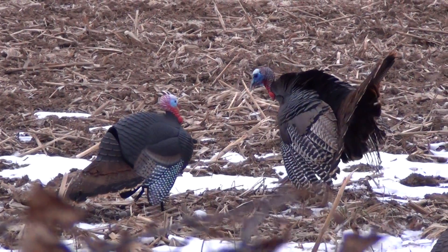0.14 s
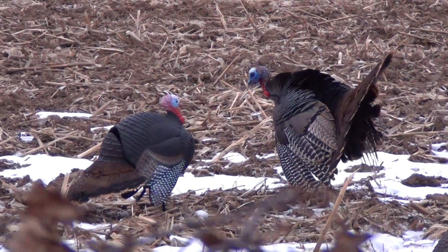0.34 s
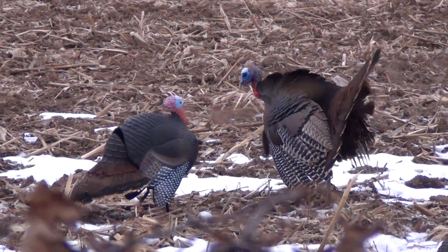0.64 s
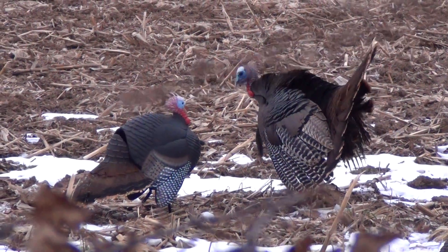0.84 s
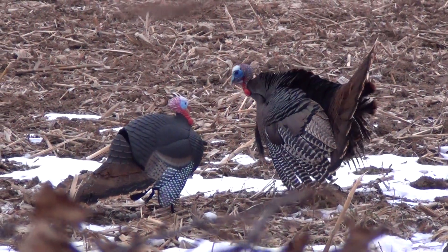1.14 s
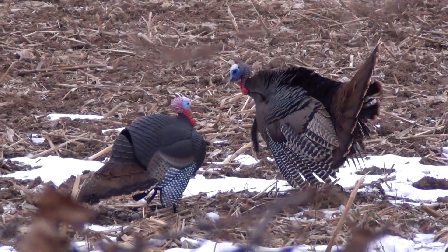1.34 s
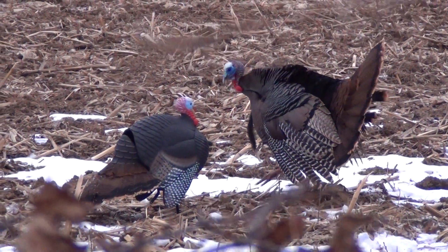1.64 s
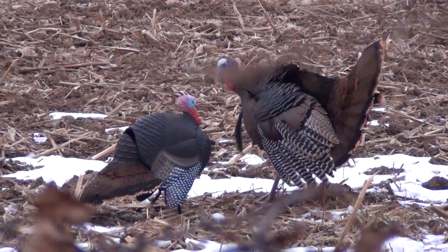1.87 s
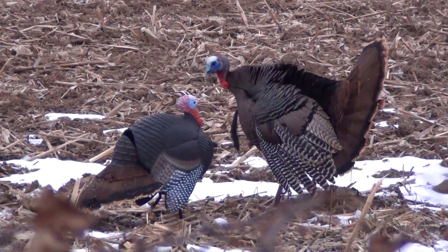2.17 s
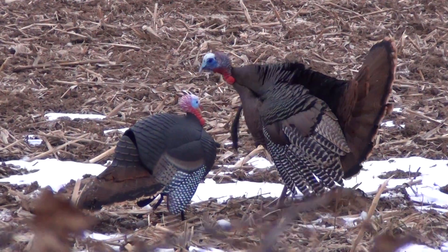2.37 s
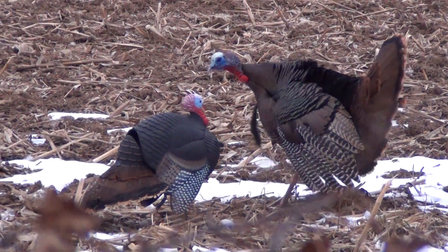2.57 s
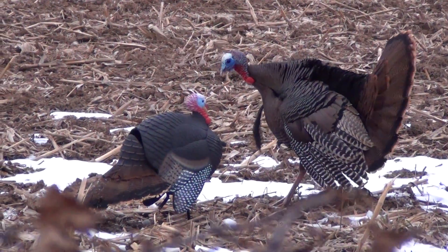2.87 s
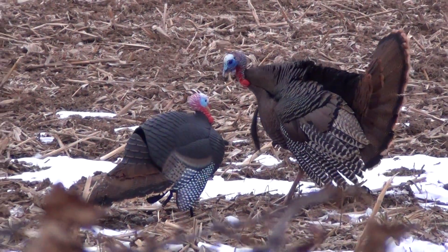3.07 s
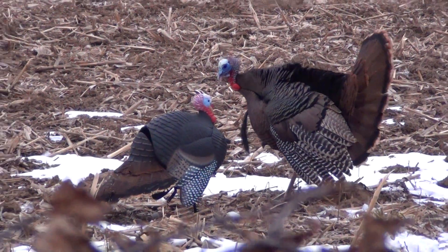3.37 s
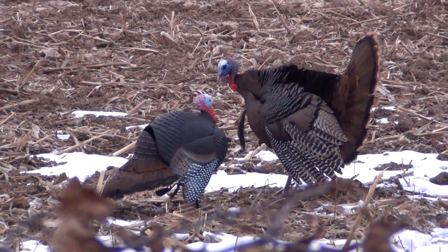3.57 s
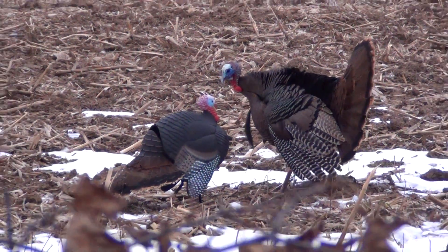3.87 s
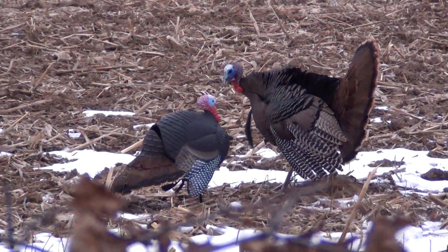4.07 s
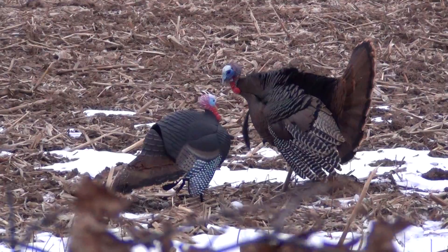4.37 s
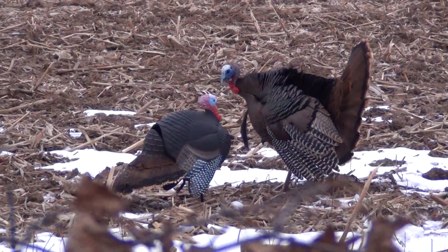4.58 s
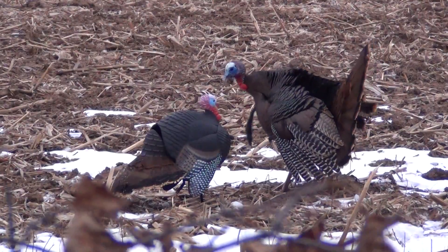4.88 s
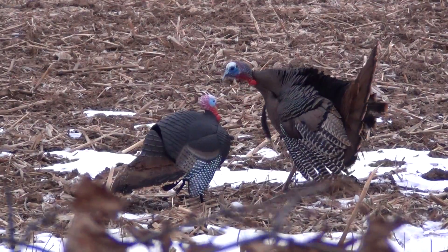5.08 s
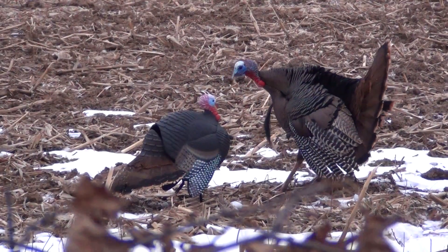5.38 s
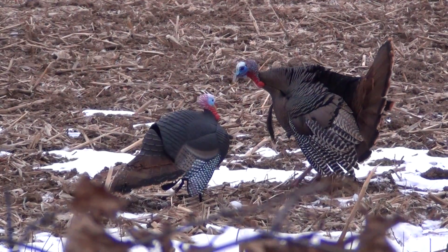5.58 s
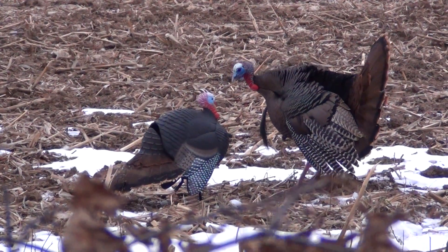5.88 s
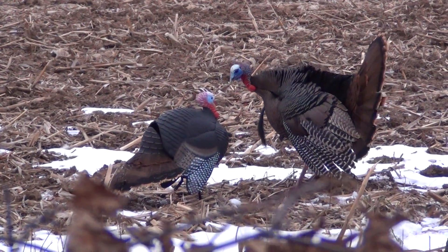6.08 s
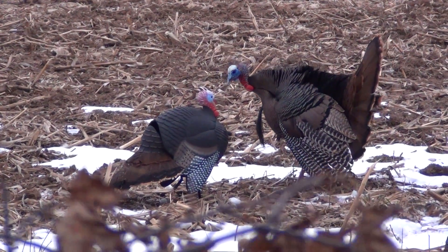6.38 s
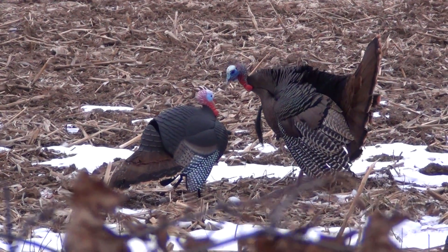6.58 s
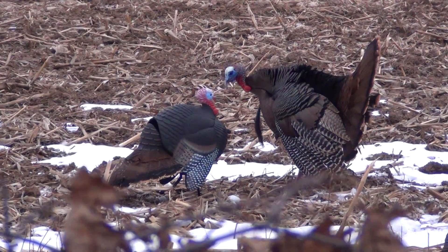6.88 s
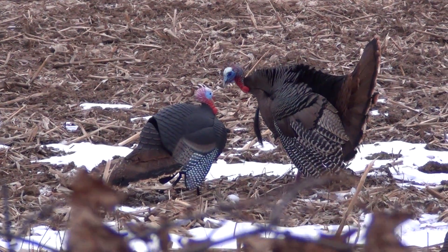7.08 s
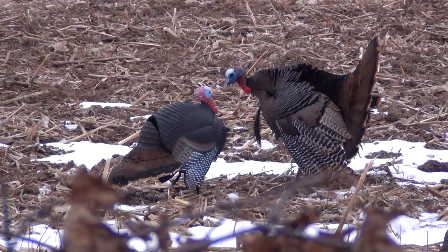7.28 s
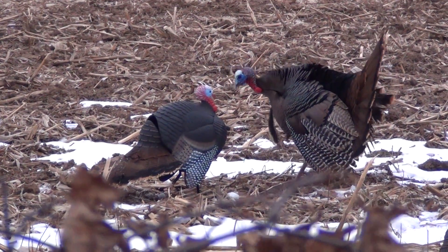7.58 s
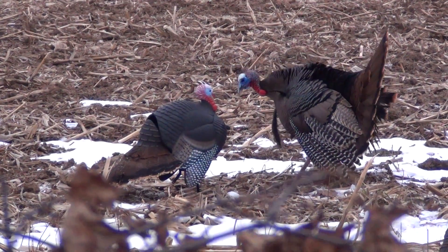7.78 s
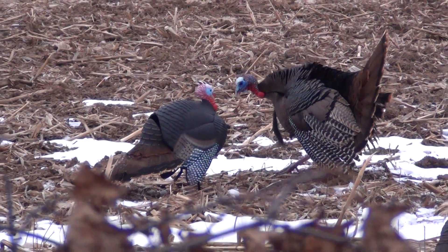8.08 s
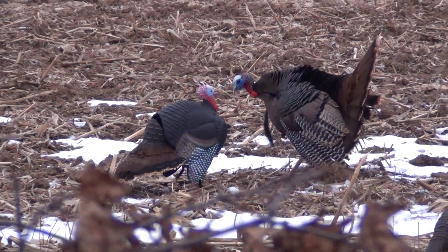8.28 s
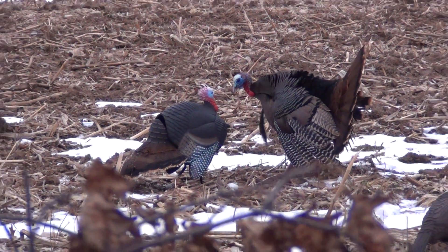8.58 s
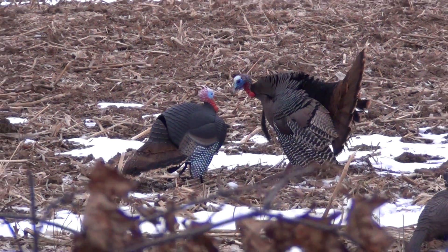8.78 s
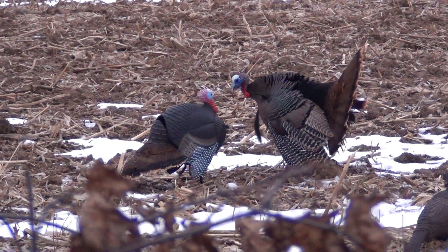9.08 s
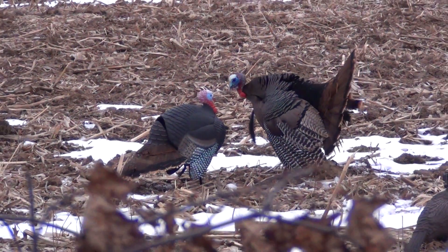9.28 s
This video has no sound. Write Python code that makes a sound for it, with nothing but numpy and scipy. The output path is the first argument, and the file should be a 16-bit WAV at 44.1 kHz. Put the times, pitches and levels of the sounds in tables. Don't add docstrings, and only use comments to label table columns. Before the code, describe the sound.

For about five seconds there is only soft wind in dry stalks, sporadic woody snaps, leaf ticks, a brief turkey purr and deep distant wingbeats speeding up. Then a nearby turkey hen-like yelp begins weakly and repeats ten times, about three per second, loud, nasal and hollow, breaking between whistle and rasp. Close dry stereo pickup outdoors, with slight scatter from stubble and faint far trees; late high bird whistles and more crackles.

```python
import sys
import numpy as np
from scipy import signal
from scipy.fft import rfft, irfft, next_fast_len
from scipy.io import wavfile
from scipy.ndimage import uniform_filter1d

SR = 44100
rng = np.random.default_rng(int(sys.argv[2]) if len(sys.argv) > 2 else 0)


def dump(signal):
    limited = np.clip(np.atleast_2d(signal).T, -1, 1)
    pcm = np.round(limited * 32767).astype(np.int16)
    wavfile.write(sys.argv[1], SR, pcm)


def gain_from_db(level_db):
    decades = np.asarray(level_db, float) / 20
    return 10 ** decades


N = 415863
TOP_HZ = 16470
LEFT_RIGHT = np.array([[.5], [-.5]])


def unit(x):
    return x / np.sqrt(np.mean(np.abs(x) ** 2) + 1e-20)


def along(points, hz):
    f, v = np.transpose(points)
    return np.interp(np.log(hz + 1), np.log(f + 1), v)


def curves(rows):
    s, *cols = np.transpose(rows)
    return [np.interp(np.arange(N) / SR, s, c) for c in cols]


def wobble(rate, size=N, count=1):
    knots = rng.standard_normal((count, int(size * rate / SR) + 4))
    u, i = np.modf(np.arange(size) * rate / SR)
    a, b, c, d = (knots[:, i.astype(int) + j] for j in range(4))
    bend = 2 * a - 5 * b + 4 * c - d + u * (3 * (b - c) + d - a)
    return b + .5 * u * (c - a + u * bend)


def filtered(x, response):
    m = next_fast_len(N + SR // 2)
    return irfft(rfft(x, m) * response(np.fft.rfftfreq(m, 1 / SR)), m)[..., :N]


def bump(hz, centre_hz, width_hz):
    return 1 / (1 + (2 * (hz - centre_hz) / width_hz) ** 2)


# frequency in Hz, likeness 0-1.
PORT_LIKENESS = [(60, .999), (150, .998), (380, 0.99), (950, 0.94), (2380, 0.85), (5980, 0.83),
                 (10000, 0.88), (12000, .993), (13500, 1)]


def rush(spectrum, crackle_db):
    grains = gain_from_db(crackle_db * np.repeat(rng.exponential(1, N // 64 + 1), 64)[:N])
    pair = rng.standard_normal((2, N)) * grains

    def response(hz):
        turn = np.arccos(np.clip(along(PORT_LIKENESS, hz), -1, 1)) / 2
        return gain_from_db(along(spectrum, hz)) * [np.cos(turn), np.sin(turn)]

    mid, side = filtered(pair, response)
    return unit(np.array([mid + side, mid - side]))


# time in seconds, level in dB.
WIND = [(0.0, -55), (0.68, -52.5), (1.21, -54.5), (1.65, -57.5), (2.18, -58), (2.39, -56), (2.86, -56),
        (3.55, -57.5), (3.89, -54), (4.07, -55.5), (4.73, -59), (5.07, -60.5), (5.93, -59.5), (6.09, -61),
        (6.7, -67), (7.98, -66.5), (8.25, -66), (9.43, -63)]
# time in seconds, change in dB.
GAIN_DIP = [(5.95, 1), (6.8, -5), (8.1, 0), (9.43, -2.5)]
# frequency in Hz, density in dB per Hz.
RUMBLE_SPECTRUM = [(12, -41), (20, -17), (65, -3), (130, -6), (236, -8.5), (350, -13), (460, -22.5),
                   (770, -120)]
RUSTLE_SPECTRUM = [(150, -9), (250, -5.5), (406, 2), (454, 0), (605, 2.5), (3500, -5.5), (4550, -24),
                   (7700, -120)]
HISS_SPECTRUM = [(1760, -12.5), (3000, -18.5), (3900, 3.5), (6500, -1.5), (9330, -2.5), (16300, -15)]
HUSK_SPECTRUM = [(5500, -38), (8000, -1.5), (9500, -2), (10500, -12), (12500, -37)]
PREAMP_SPECTRUM = [(1000, -11), (5000, -17.5), (9500, -6.5), (12000, -8.5), (16300, 3)]


def field():
    rustle_db, = curves(WIND)
    dip_db, = curves(GAIN_DIP)
    wind_db = rustle_db + 56.5
    rumble_db = -64 + .48 * wind_db + dip_db
    hiss_db = -60.5 + .99 * wind_db
    gust = wobble(14)
    low = gain_from_db(rumble_db + 2.1 * wobble(13)) * rush(RUMBLE_SPECTRUM, crackle_db=.1)
    mid = gain_from_db(rustle_db + .9 * gust) * rush(RUSTLE_SPECTRUM, crackle_db=1.7)
    high = gain_from_db(hiss_db + .9 * gust) * rush(HISS_SPECTRUM, crackle_db=1.4)
    husks = gain_from_db(hiss_db - 12.5) * rush(HUSK_SPECTRUM, crackle_db=2.9)
    preamp = gain_from_db(-75) * rush(PREAMP_SPECTRUM, crackle_db=1.6)
    return low + mid + high + husks + preamp


# start in seconds, peak level in dB.
WINGBEATS = [(0.154, -58), (0.368, -57), (0.788, -54), (1.107, -63), (1.32, -60), (1.833, -53),
             (2.268, -56.5), (2.655, -56), (2.997, -54), (3.31, -50), (3.592, -53), (3.852, -57),
             (4.093, -62), (4.299, -59.5), (4.501, -55), (4.684, -56), (4.853, -55), (5.012, -59),
             (5.155, -57), (5.289, -54), (5.407, -57), (5.523, -54), (5.619, -65)]


def thumps():
    out, t = np.zeros(N + SR), np.arange(SR // 4) / SR
    rise_s, t60_s, pitch_hz = .01, .1, 66
    shape = gain_from_db(-60 * t / t60_s) * (1 - np.exp(-t / rise_s))
    push = shape / shape.max() * np.sin(2 * np.pi * pitch_hz * t)
    for s, db in WINGBEATS:
        out[round(s * SR):][:len(t)] += gain_from_db(db - 1) * push
    return out[:N]


# start in seconds, peak level in dB, pitch in Hz, left over right in dB.
STALK_SNAPS = [(0.641, -36.5, 2700, 7), (0.648, -31.5, 1520, 3), (0.669, -44, 1110, 7),
               (0.68, -38, 710, -2), (1.145, -32.5, 660, -1.5), (1.706, -41, 1120, -11),
               (2.771, -28.5, 1870, -3.5), (2.774, -50.5, 910, -1), (3.748, -30.5, 870, 1),
               (3.756, -33.5, 920, -9), (5.395, -39.5, 1730, 6), (5.408, -43, 2110, -2),
               (6.472, -47, 1590, 0), (7.628, -41.5, 500, 0.5), (7.868, -45, 870, -8),
               (8.353, -30.5, 900, 3), (8.698, -45, 1290, -5), (8.718, -34.5, 856, 4), (8.83, -44, 1310, 5),
               (8.897, -47, 864, 8), (8.921, -42, 1130, 6), (9.04, -43, 854, 6), (9.049, -34, 1170, -6),
               (9.048, -46.5, 5100, -3), (8.719, -51, 3280, 3)]
# start in seconds, peak level in dB, pitch in Hz.
DRY_TICKS = [(0.659, -38.5, 630), (1.277, -43, 1620), (1.292, -42, 5170), (1.571, -45.5, 5500),
             (7.45, -55, 5200), (8.32, -51, 3500), (5.918, -50, 1500), (5.933, -49.5, 1500),
             (1.429, -45, 1250), (1.502, -42.5, 620), (1.536, -48, 1280), (3.049, -42, 770),
             (3.704, -46, 735), (3.849, -43, 993), (4.024, -41, 910), (2.93, -53, 700), (5.17, -60, 600),
             (7.58, -58, 4000), (4.369, -46, 1370), (5.582, -49, 3140), (7.215, -58, 630),
             (7.485, -61, 910), (8.629, -68, 5000), (9.004, -52, 705), (9.109, -68, 1300),
             (9.177, -53, 850)]


def snaps():
    out, t = np.zeros((2, N + SR)), np.arange(SR // 16) / SR
    sharp = signal.butter(2, [2500, 8000], "band", fs=SR)
    dull = [(s, db, hz, -22, pan_db, .029) for s, db, hz, pan_db in STALK_SNAPS]
    bright = [(s, db, hz, 0, 2.5, .074) for s, db, hz in DRY_TICKS]
    for s, db, hz, crack_db, pan_db, t60 in dull + bright:
        shape = gain_from_db(-60 * t / t60) * (1 - np.exp(-t / .00037))
        body, crack = shape * rng.standard_normal((2, len(t)))
        body = signal.lfilter(*signal.butter(3, [hz * .6, hz * 2.2], "band", fs=SR), body)
        crack = signal.lfilter(*sharp, crack)
        snap = body / np.abs(body).max() + gain_from_db(crack_db) * crack / np.abs(crack).max()
        out[:, round(s * SR):][:, :len(t)] += gain_from_db(db - 1.5 + pan_db * LEFT_RIGHT) * snap
    return out[:, :N]


# start in seconds, length in seconds, level in dB.
HUSK_SQUEAKS = [(2.181, 0.011, -54), (2.487, .02, -59), (7.83, .012, -69), (8.195, .006, -66),
                (8.283, .006, -68), (8.299, 0.024, -60), (8.926, .01, -68), (9.001, .01, -65),
                (9.022, .008, -66), (9.112, 0.0045, -69), (9.175, .01, -68), (9.21, 0.01, -70),
                (9.278, .02, -65.5)]


def squeaks():
    gate = np.zeros(N)
    for s, length, db in HUSK_SQUEAKS:
        size = round(length * SR)
        gate[round(s * SR):][:size] += gain_from_db(db) * np.hanning(size)
    noise = rng.standard_normal(N)
    return gate * unit(filtered(noise, lambda hz: bump(hz, 9200, 1200)))


# start in seconds, length in seconds, pitch in Hz, level in dB.
SOFT_NOTES = [(2.246, 0.037, 336, -54.5), (2.274, 0.047, 438, -54), (2.31, 0.048, 516, -57),
              (2.347, 0.023, 480, -56), (2.36, 0.019, 703, -50.5), (2.381, 0.013, 1330, -49),
              (2.407, 0.011, 530, -48), (2.459, 0.017, 554, -50.5), (2.518, 0.036, 670, -59),
              (2.952, 0.073, 338, -62), (3.022, 0.051, 276, -67), (5.055, 0.022, 500, -50.5),
              (3.903, 0.098, 990, -60), (3.99, 0.05, 960, -60), (3.947, .03, 3570, -58.5),
              (4.175, .03, 3530, -60), (4.305, .03, 3490, -59)]


def purrs():
    out = np.zeros(N)
    for s, length, hz, db in SOFT_NOTES:
        t = np.arange(round(length * SR)) / SR
        swell = np.sin(np.pi * t / length)
        out[round(s * SR):][:len(t)] += gain_from_db(db) * swell * np.sin(2 * np.pi * hz * t)
    return out


# frequency in Hz, gain in dB.
THROAT_GAIN = [(300, -37), (660, -5.5), (2650, -8.5), (3300, -15), (4000, -9.5), (4650, -26.5),
               (5250, -40.5), (6000, -35.5), (6700, -45), (7500, -53), (8500, -35), (9400, -26.5),
               (10600, -51.5), (12000, -32), (14200, -34), (16300, -47)]
# frequency in Hz, width in Hz, gain in dB.
PIPE_RESONANCES = [(480, 85, -1), (954, 50, -1), (1265, 40, 4.5), (1800, 71, 5), (2104, 33, 0)]


def register(notes, effort_db, beak_hz, tilt_db, purity, odd_db, pipe_db, smear, skull_db, hollow):
    out, cycles = np.zeros(N), np.zeros(N)
    for start, end, hz0, hz1, db, rasp in notes:
        first, size = round((start - .002) * SR), round((end - start + .004) * SR)
        span, t = slice(first, first + size), np.arange(size) / SR
        k = np.arange(1, int(TOP_HZ / max(hz0, hz1)))[:, None]
        pitch = np.linspace(hz0, hz1, size)
        hz, beak = k * pitch, beak_hz[span]
        cycles[span] = cycles[first] + np.cumsum(pitch) / SR
        shake = hz0 * .00032 * np.sqrt(rasp) * wobble(220, size)
        blur = wobble(smear * hz0, size, len(k)) + 1j * wobble(smear * hz0, size, len(k))
        breath = np.clip(rasp * (.5 + hz0 * k / 1600) + np.maximum(hz0 * k / 14000 - .4, 0), 0, 1)
        phase = k * (2 * np.pi * cycles[span] + shake) + 1.3 * k ** 2
        wave = (np.sqrt(1 - breath) + np.sqrt(breath / 2) * blur) * np.exp(1j * phase)

        tilt = tilt_db + purity * np.minimum(effort_db[span] + 27, 0)
        slope_db = tilt * np.minimum(k - 1, max(3, 950 / hz0))
        gain = gain_from_db(along(THROAT_GAIN, hz) + slope_db + odd_db * (k % 2))
        gain = gain * gain_from_db(2.2 * np.minimum(k - 1, 2) / 2 * wobble(45, size, len(k)))
        pipe = sum(gain_from_db(level + pipe_db) ** 2 * bump(hz, c, w) for c, w, level in PIPE_RESONANCES)
        mouth = gain_from_db(16) ** 2 * bump(hz, beak, 180)
        upper_mouth = gain_from_db(-2.5) ** 2 * bump(hz, 1.92 * beak, 500)
        skull = gain_from_db(skull_db) ** 2 * bump(hz, 3500, 570)
        gain = gain * np.sqrt(1 + pipe + mouth + skull + upper_mouth)
        gain = gain * (1 - hollow * bump(hz, 1.52 * beak, 450))
        edge = np.clip(np.minimum(t, t[-1] - t) / .004, 0, 1)
        out[span] += gain_from_db(db) * edge * np.sum(gain * wave.real, axis=0)
    return out


SWOOP_S = .0161
STEADY_RASP, GLIDE_RASP = .023, .15


def clear_note(start, end, entry_hz, hz, sagged_hz):
    recover_s, flick_s, flick_hz = .016, .014, 727
    settled = start + SWOOP_S
    knee, knee_hz = start + .4 * SWOOP_S, entry_hz + .742 * (hz - entry_hz)
    swoop = [(start, knee, entry_hz, knee_hz, 0, GLIDE_RASP),
             (knee, settled, knee_hz, hz, 0, 2 * STEADY_RASP)]
    broken = any(row[0] - flick_s < end < row[1] for row in DOUBLED_NOTES)
    if broken:
        return [*swoop, (settled, end, hz, sagged_hz, 0, STEADY_RASP)]
    flick, low = end - flick_s, end - flick_s - recover_s
    return [*swoop, (settled, low, hz, sagged_hz, 0, STEADY_RASP),
            (low, flick, sagged_hz, hz, 0, 2 * STEADY_RASP),
            (flick, end, hz, flick_hz, 0, GLIDE_RASP)]


def leak():
    whistle_db, clear_db, rough_db = -23.5, -31, -13
    db, t = np.full(N, whistle_db), np.arange(N) / SR
    for start, end, *_ in CLEAR_NOTES:
        db[(t > start + SWOOP_S) & (t < end - SWOOP_S)] = clear_db
    for notes, level_db in ((MUFFLED_NOTES, clear_db), (DOUBLED_NOTES + RASPY_NOTES, rough_db)):
        for start, end, *_ in notes:
            db[(t > start) & (t < end)] = level_db
    return uniform_filter1d(db, round(.01 * SR))


# time in seconds, effort in dB, beak resonance in Hz.
EARLY_EFFORT = [
    [(5.42, -62.5, 1360), (5.43, -65, 1360), (5.444, -47, 1360), (5.46, -46, 1370), (5.506, -50.5, 1340),
     (5.522, -70, 1400), (5.54, -65, 1360)],
    [(5.705, -72, 1040), (5.725, -31, 1040), (5.733, -24.5, 1030), (5.745, -28.5, 1020), (5.765, -25, 1306),
     (5.795, -27, 1310), (5.811, -35, 1280), (5.823, -66, 1370), (5.835, -58, 1340)],
    [(5.995, -71, 1210), (6.002, -34, 1260), (6.022, -20.5, 1420), (6.049, -21.5, 1530), (6.057, -26, 1300),
     (6.074, -22.5, 1230), (6.087, -23, 1050), (6.101, -22.5, 1000), (6.12, -66, 1000)],
    [(6.258, -71.5, 1400), (6.265, -46.5, 1400), (6.289, -16.5, 1260), (6.298, -20, 1400),
     (6.306, -19.5, 1490), (6.329, -21, 1550), (6.357, -24, 1490), (6.375, -22, 1140), (6.415, -64.5, 1030)],
    [(6.545, -47, 1300), (6.553, -41, 1280), (6.56, -19, 1280), (6.566, -26, 1490), (6.576, -20.5, 1800),
     (6.639, -22.5, 1820), (6.653, -25.5, 1700), (6.669, -29.5, 1200), (6.69, -64, 1300)],
]
LATE_EFFORT = [
    [(6.88, -59, 1410), (6.89, -35.5, 1440), (6.902, -22, 1430), (6.922, -22, 1930), (6.942, -21.5, 1960),
     (6.972, -25.5, 1760), (6.98, -23.5, 1660), (7.004, -30.5, 1350), (7.025, -68, 1100)],
    [(7.24, -78, 1380), (7.252, -43, 1420), (7.268, -26.5, 1360), (7.276, -22, 1420), (7.294, -23, 1880),
     (7.316, -22.5, 1830), (7.345, -23, 1520), (7.372, -36.5, 1120), (7.385, -62, 1050)],
    [(7.632, -51, 1410), (7.644, -32.5, 1530), (7.653, -26, 1510), (7.659, -23, 1350), (7.67, -28.5, 1760),
     (7.692, -21, 1910), (7.72, -25, 1870), (7.748, -34.5, 1550), (7.758, -63, 1490)],
    [(8.004, -62, 1390), (8.014, -39.5, 1400), (8.024, -29.5, 1540), (8.033, -22, 1420), (8.041, -27, 1670),
     (8.056, -21.5, 1830), (8.078, -22, 1840), (8.112, -35, 1630), (8.13, -57, 1540)],
    [(8.364, -37, 1410), (8.374, -34, 1350), (8.383, -26.5, 1530), (8.391, -20.5, 1450), (8.4, -25.5, 1710),
     (8.434, -21.5, 1860), (8.444, -27, 1800), (8.474, -29.5, 1490), (8.495, -72, 1390)],
]
# start and end in seconds, pitch in Hz, level in dB.
OPENING_WHISTLES = [
    (6.265, 6.286, 1587, -7),
    (6.888, 6.898, 1120, 6),
    (7.253, 7.257, 1140, 8),
    (7.642, 7.649, 1064, -1),
    (8.011, 8.023, 1096, 9),
    (8.373, 8.38, 1057, 10),
]
# start and end in seconds, first and last
# pitch in Hz, level in dB.
SLIDING_WHISTLES = [(5.804, 5.826, 866, 1020, 7), (5.998, 6.017, 1208, 1063, 6.5),
                    (6.017, 6.022, 1130, 1230, 2.5), (6.085, 6.113, 875, 1055, 16),
                    (6.363, 6.387, 899, 1122, 12.5), (6.653, 6.667, 840, 1100, 7.5),
                    (6.665, 6.685, 1160, 1350, 6), (6.989, 7.015, 875, 1100, 7),
                    (7.364, 7.374, 910, 1035, 8), (7.743, 7.745, 840, 910, -3), (8.475, 8.49, 880, 1000, 2)]
# start and end in seconds, pitch in Hz, level in dB, rasp 0-1.
HELD_WHISTLES = [
    (5.719, 5.741, 1032, -9, 0.01),
    (6.28, 6.296, 1220, 6.5, 0.04),
    (6.386, 6.408, 1410, 31, 0.5),
    (6.553, 6.565, 1240, -4, 0.25),
    (7.256, 7.268, 1160, 2, 0.3),
]
# start and end in seconds, first and last pitch in Hz, rasp 0-1.
MUFFLED_NOTES = [
    (5.432, 5.48, 676, 696, 0.07),
    (5.48, 5.522, 700, 770, .05),
    (5.74, 5.805, 678.4, 698, 0.07),
    (6.022, 6.044, 731, 732, 0.01),
    (6.044, 6.053, 725, 766, 0.23),
    (6.297, 6.319, 753, 731, 0.15),
    (6.331, 6.34, 728, 740, 0),
    (6.348, 6.362, 724, 753, 0),
]
# start and end in seconds, entry, settled and sagged pitch in Hz.
CLEAR_NOTES = [
    (6.9, 6.931, 742, 679, 686),
    (7.272, 7.303, 752, 670, 677),
    (7.65, 7.751, 800, 665.7, 652.5),
    (8.019, 8.117, 872, 663.4, 643),
    (8.379, 8.483, 821, 674, 655),
]
# start and end in seconds, first and last pitch in Hz, rasp 0-1.
DOUBLED_NOTES = [
    (6.047, 6.084, 392, 411, 0.081),
    (6.932, 6.979, 372.5, 367.4, 0.2),
    (7.302, 7.367, 364.7, 360.4, 0.18),
]
# start and end in seconds, pitch in Hz, level in dB, rasp 0-1.
RASPY_NOTES = [
    (6.316, 6.336, 258, -13.5, 0.37),
    (6.341, 6.35, 263, -8, 0.15),
    (6.36, 6.373, 249, -9, 0.3),
    (6.563, 6.653, 158.1, -14, 0.54),
    (6.977, 6.989, 248.5, -5.5, 0.3),
    (6.931, 6.944, 234.5, -8.5, 0.46),
    (7.302, 7.328, 232.8, -13, 0.56),
]


def turkey():
    effort_db, beak_hz = curves(np.concatenate(EARLY_EFFORT + LATE_EFFORT))
    whistle = [(a, b, hz, .82 * hz, db, .072) for a, b, hz, db in OPENING_WHISTLES]
    whistle += [(*row, .06) for row in SLIDING_WHISTLES]
    whistle += [(a, b, hz, hz, db, rasp) for a, b, hz, db, rasp in HELD_WHISTLES]
    muffled = [(*row[:4], 0, row[4]) for row in MUFFLED_NOTES]
    doubled = [(*row[:4], 0, row[4]) for row in DOUBLED_NOTES]
    clear = [part for row in CLEAR_NOTES for part in clear_note(*row)]
    raspy = [(a, b, hz, 1.02 * hz, db, rasp) for a, b, hz, db, rasp in RASPY_NOTES]

    voice = register(whistle, effort_db, beak_hz, tilt_db=-8, purity=.02, odd_db=4, pipe_db=-20,
                     smear=.3, skull_db=12.5, hollow=.55)
    voice += gain_from_db(-3.5) * register(muffled, effort_db, beak_hz, tilt_db=-1.5, purity=.6, odd_db=.5, pipe_db=-26,
                                  smear=.17, skull_db=1.5, hollow=.95)
    voice += register(clear, effort_db, beak_hz, tilt_db=-1.3, purity=.13, odd_db=-1.5, pipe_db=-22,
                      smear=.27, skull_db=5.5, hollow=.18)
    voice += register(doubled, effort_db, beak_hz, tilt_db=-.5, purity=.1, odd_db=-4, pipe_db=4.5,
                      smear=.73, skull_db=0, hollow=.43)
    voice += gain_from_db(-12) * register(raspy, effort_db, beak_hz, tilt_db=3.5, purity=.1, odd_db=3, pipe_db=15.5,
                                 smear=.6, skull_db=8, hollow=.4)
    voice = voice / np.sqrt(np.abs(uniform_filter1d(voice ** 2, round(.014 * SR))) + .01)

    breath, heave = rng.standard_normal((2, N))
    air = unit(filtered(breath, lambda hz: gain_from_db(along(THROAT_GAIN, hz)) * hz / (hz + 1500)))
    air += gain_from_db(-24.5) * unit(filtered(heave, lambda hz: bump(hz, 0, 500)))
    sounding = effort_db > -54
    return gain_from_db(effort_db) * (voice + sounding * gain_from_db(leak()) * air)


def tail(decay, delay_s):
    hz, t, z = signal.stft(rng.standard_normal((2, SR // 2)), SR, nperseg=256)
    z = z * gain_from_db(-60 * t / along(decay, hz)[:, None])
    colour = hz / (hz + 2500) * (hz < 11000)
    plain = signal.istft(z, SR, nperseg=256)[1]
    answer = signal.istft(z * colour[:, None], SR, nperseg=256)[1] / np.linalg.norm(plain[0])
    return np.pad(answer, ((0, 0), (round(delay_s * SR), 0)))[:, :SR // 2]


# frequency in Hz, left over right in dB.
PORT_LEVEL = [(300, -.1), (700, -.3), (1100, .3), (1500, .5), (2100, -2), (2800, -2), (3600, -3),
              (4300, -4), (6000, 0), (9400, -1), (12000, 0)]
# frequency in Hz, left ahead of right in radians.
PORT_LEAD = [(300, .05), (700, .08), (1400, .25), (2100, .4), (3300, .5), (4100, .7), (6000, .3),
             (9400, .5), (11500, .03)]
# frequency in Hz, t60 in seconds.
TREE_DECAY = [(500, .45), (1800, .6), (5000, .3)]
STUBBLE_DECAY = [(500, .04), (2000, 0.028), (5000, 0.049), (10000, 0.033)]


def at_ports(bird):
    direct = filtered(bird, lambda hz: gain_from_db(LEFT_RIGHT * along(PORT_LEVEL, hz))
                      * np.exp(1j * LEFT_RIGHT * along(PORT_LEAD, hz)))
    answer = gain_from_db(-24.5) * tail(TREE_DECAY, .025) + gain_from_db(-8) * tail(STUBBLE_DECAY, .00105)
    return direct + signal.oaconvolve(bird[None], answer, axes=1)[:, :N]


# time in seconds, pitch in Hz, level in dB.
SONG_WHISTLES = [
    [(7.49, 3470, -76), (7.55, 3390, -64), (7.65, 3320, -65), (7.83, 3290, -69)],
    [(7.95, 2970, -70), (8.0, 3010, -61), (8.07, 3070, -76), (8.2, 3030, -73)],
    [(8.17, 2980, -75), (8.23, 3020, -63), (8.31, 3010, -63), (8.38, 3020, -64)],
]


def songbird():
    out, flutter = np.zeros(N), wobble(20)[0]
    for rows in SONG_WHISTLES:
        s, hz, db = np.transpose(rows)
        span = np.arange(round(s[0] * SR), round(s[-1] * SR))
        t = span / SR
        edge = np.clip(np.minimum(t - s[0], s[-1] - t) / .03, 0, 1)
        level = gain_from_db(np.interp(t, s, db) + 2.5 + 1.7 * flutter[span])
        out[span] += edge * level * np.sin(2 * np.pi * np.cumsum(np.interp(t, s, hz)) / SR)
    return out


def scene():
    ground = field() + thumps() + snaps() + squeaks()
    far_song = songbird() * gain_from_db([[-1.5], [1.5]])
    return ground + purrs() + at_ports(turkey()) + far_song


def low_pass(x):
    return signal.sosfilt(signal.butter(12, 16420, fs=SR, output="sos"), x)


def record(dry):
    mix = filtered(dry, lambda hz: hz < TOP_HZ)
    return low_pass(mix)


dry = scene()
out = record(dry)
dump(out)
```